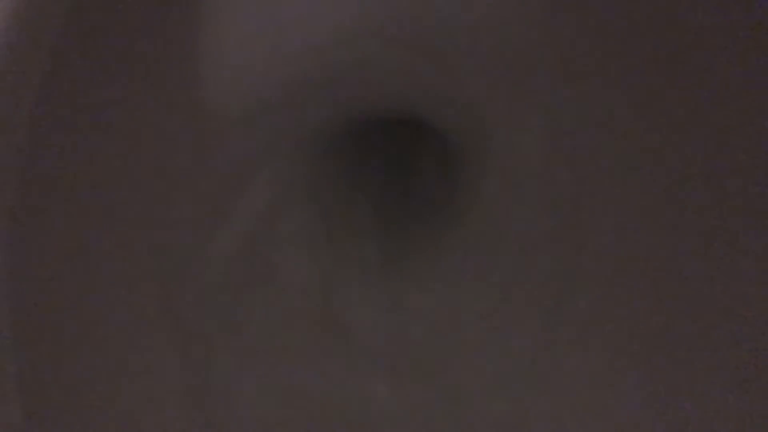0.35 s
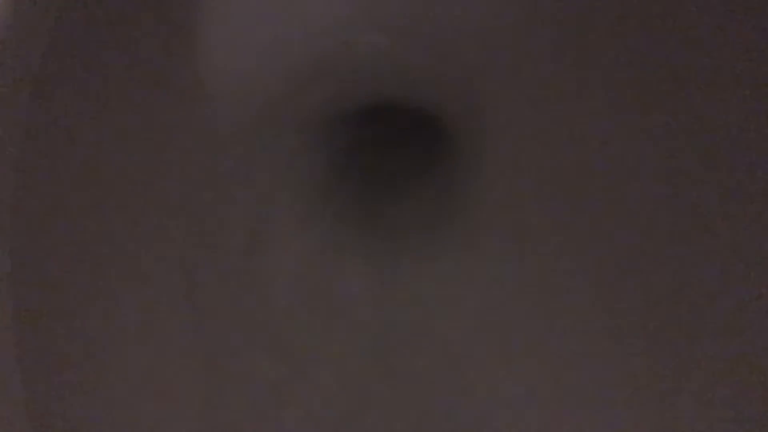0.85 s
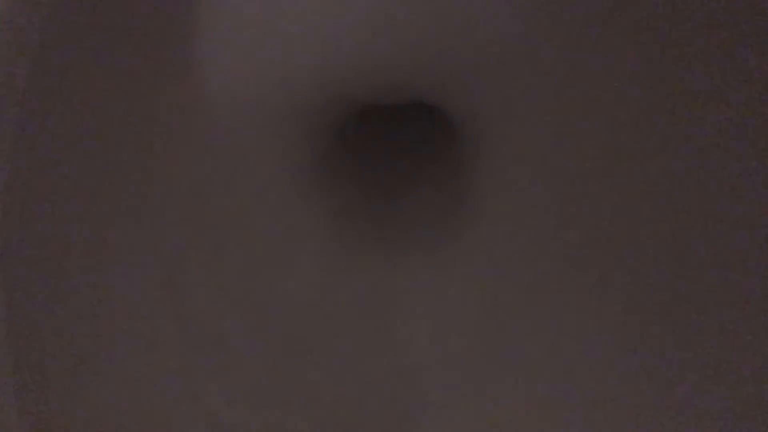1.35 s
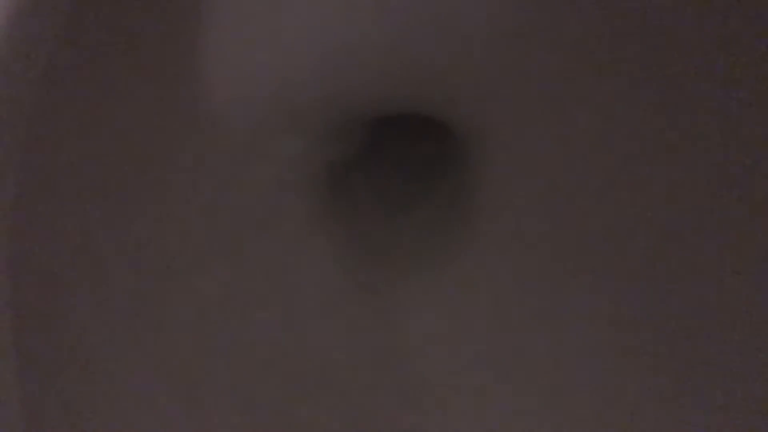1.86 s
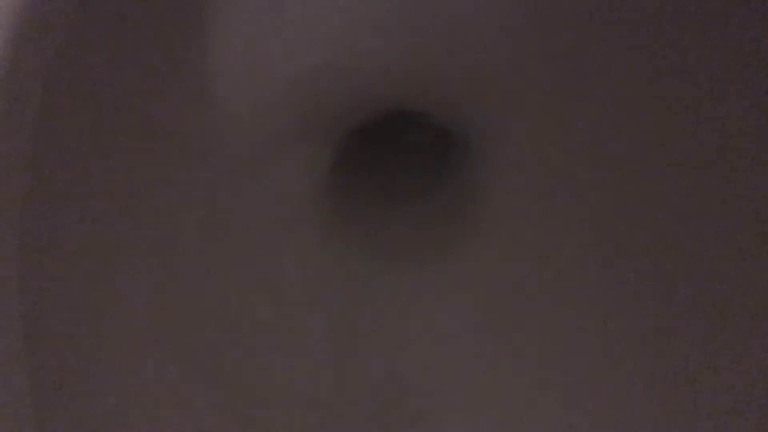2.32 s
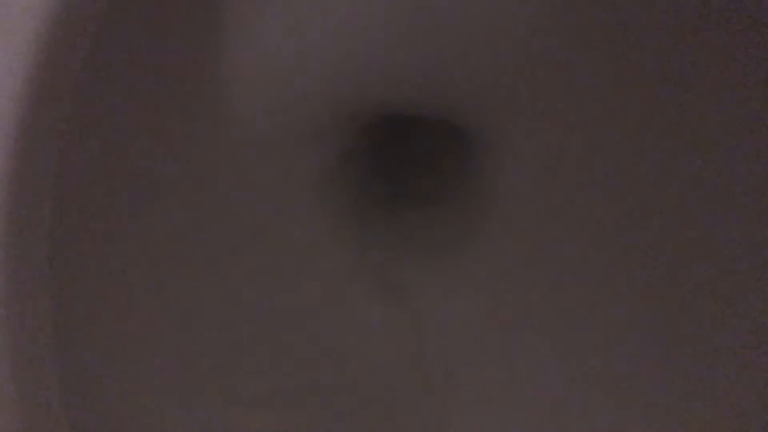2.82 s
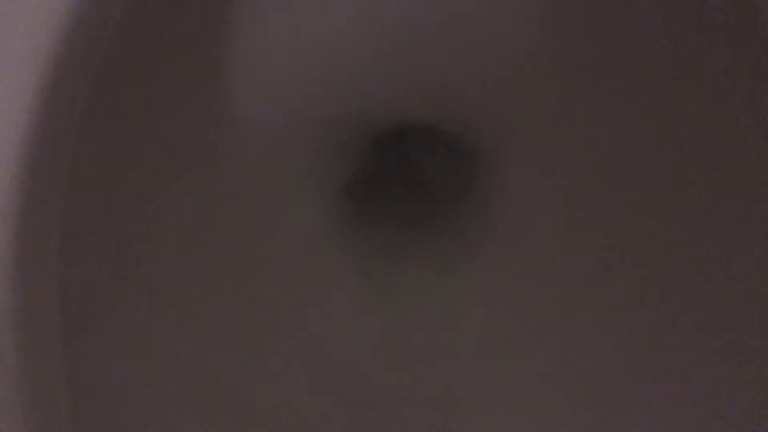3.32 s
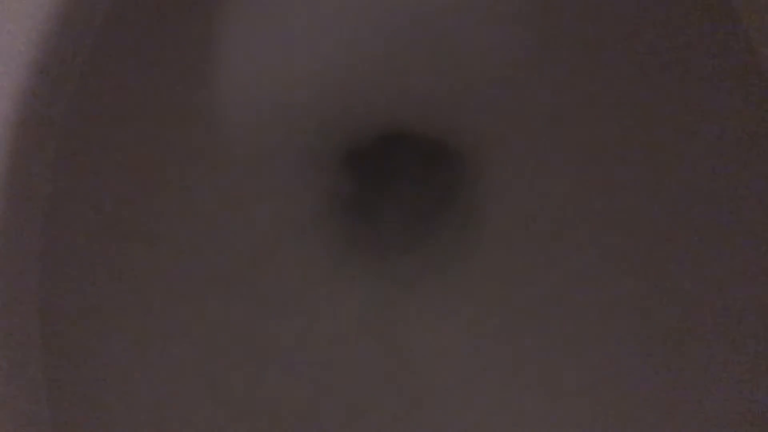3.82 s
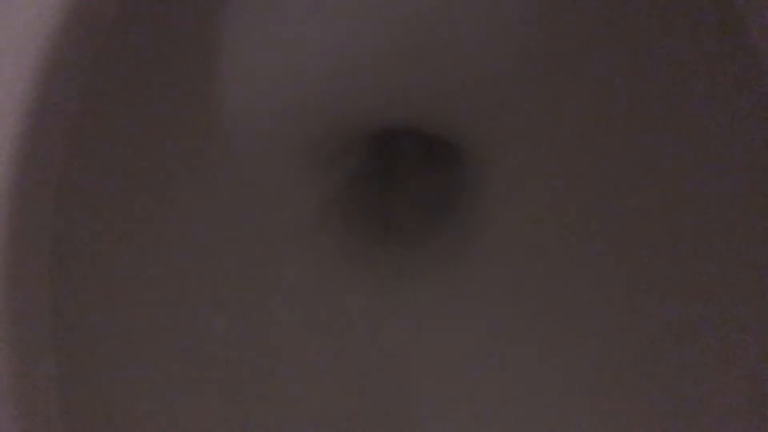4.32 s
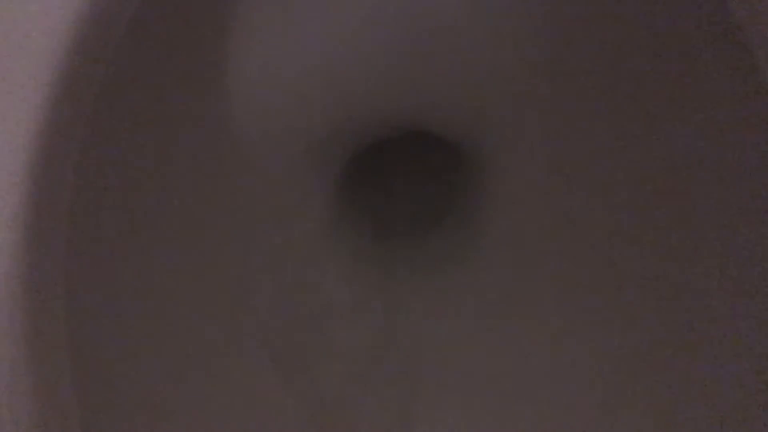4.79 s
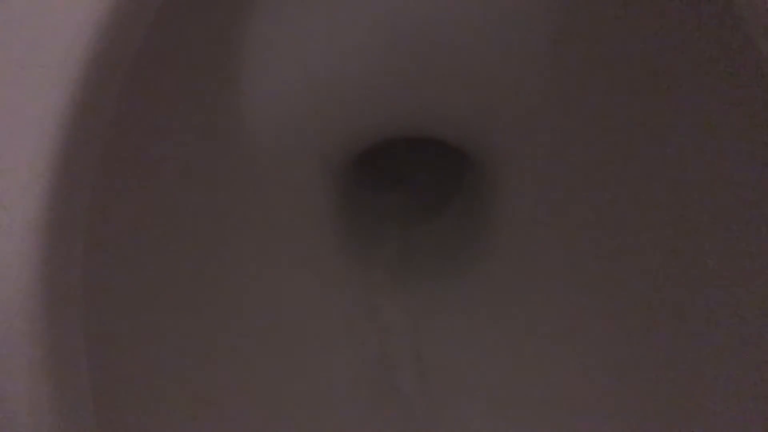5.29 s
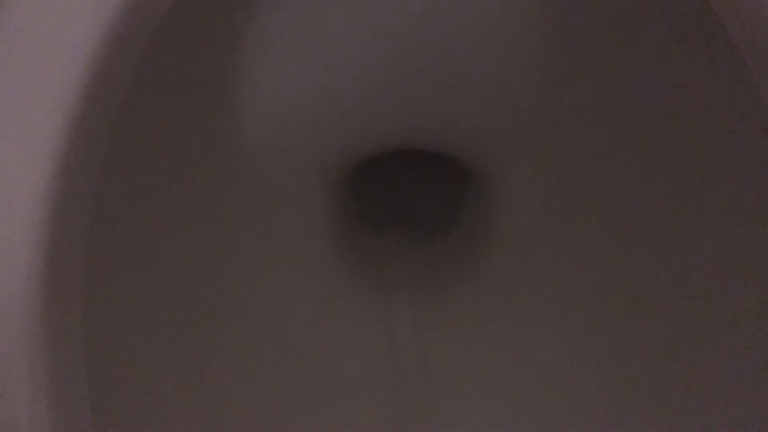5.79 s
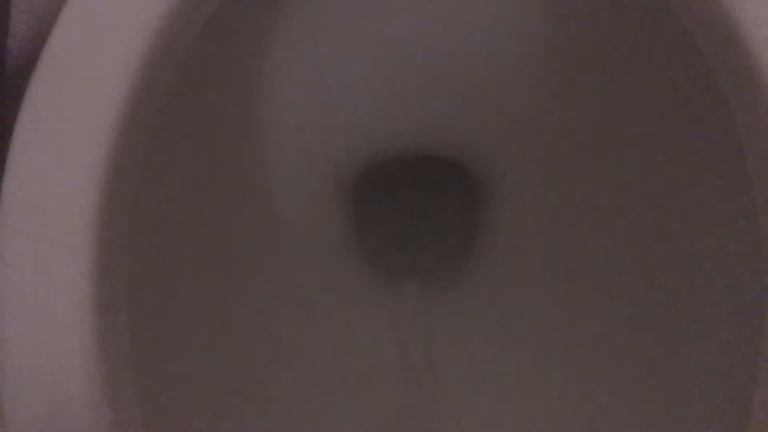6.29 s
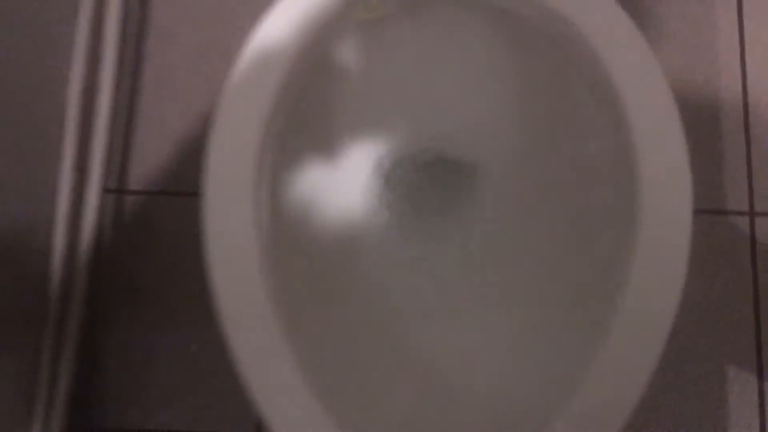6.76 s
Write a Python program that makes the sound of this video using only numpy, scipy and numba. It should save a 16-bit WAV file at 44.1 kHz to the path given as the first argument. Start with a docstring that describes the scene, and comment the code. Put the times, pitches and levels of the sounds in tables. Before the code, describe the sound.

Inside a toilet bowl in a small restroom, a flush is already under way. Bright jets hiss and spray under the rim while the trap surges and bubbles, swelling to deep, hollow gulps near two seconds. The water hiss runs on, then stops around five seconds, leaving loud glugs, slaps and drips, and one last soft rush through the pipe. The microphone is very close, with faint building rumble beneath.

```python
"""Toilet flush inside the bowl

A toilet flushes in a small restroom, heard by one microphone in the bowl (two equal channels).
Noise jets hiss under the rim, spray and turbulence ring the rim channel, and swarms of bubbles and surging
water in the trap ring the hollow bowl. The siphon breaks in glugs and whistles (dying sines of rising pitch)
and splashes (noise bursts); a last rush of filtered noise runs through the pipe over a low building rumble."""
import sys
import numpy as np
from scipy import signal
from scipy.fft import rfft, irfft, next_fast_len
from scipy.io import wavfile
from scipy.ndimage import uniform_filter1d
from numba import njit

SR = 44100
rng = np.random.default_rng(int(sys.argv[2]) if len(sys.argv) > 2 else 0)


def master_out(mix):
    """Clip the mix to full scale and print it as 16-bit PCM to the path in sys.argv[1]."""
    frames = np.transpose(np.atleast_2d(mix))
    ceiling = np.clip(frames, -1, 1)
    pcm = np.round(ceiling * 32767).astype(np.int16)
    wavfile.write(sys.argv[1], SR, pcm)


def to_linear_factor(level_db):
    """Convert decibel levels (scalar or array-like) to linear amplitude factors."""
    exponent = np.asarray(level_db, float) / 20
    return 10 ** exponent


N = 314874  # length in samples
SIZE = next_fast_len(N + SR)  # transform length, with room for ringing
HZ = np.arange(SIZE // 2 + 1) * SR / SIZE

# Water and air working in the trap between gulps.
# Each row: time in seconds, surge level in dB, churning air level in dB.
TRAP = [(0.0, -33.5, -40), (0.27, -37, -40), (0.49, -39, -34.5), (1.15, -33, -31), (1.5, -25.5, -23.5),
        (1.95, -28.5, -23.5), (2.5, -35, -26.5), (2.85, -32.5, -26), (3.3, -37.5, -35),
        (4.05, -39.5, -31.5), (4.5, -36, -35), (4.8, -43, -33), (4.98, -67, -40), (5.335, -55, -34),
        (5.36, -20.5, -29), (5.6, -25, -28), (5.75, -33.5, -32), (6.0, -37, -37.5), (6.29, -48, -43),
        (6.45, -65, -51)]
# Gulps of air drawn through the trap.
# Each row: peak time in seconds, surge burst in dB, churning air burst in dB.
GULPS = [(0.089, -22.5, -25), (0.538, -37, -29.5), (0.789, -27, -32), (0.994, -28, -24), (1.261, -22, -19),
         (1.431, -18.5, -16), (1.555, -19, -24), (1.6, -19.5, -18), (1.729, -15.5, -15), (1.856, -10, -14),
         (1.906, -18, -27), (2.041, -34, -21.5), (2.281, -22, -38), (2.43, -24, -17), (2.672, -28, -42),
         (2.908, -27, -42), (4.142, -27.5, -25), (4.58, -24.5, -23), (5.031, -57, -21), (5.161, -30, -29),
         (5.353, -15, -19), (5.378, -19, -14.5), (5.504, -17, -26), (5.59, -13, -18), (5.658, -19.5, -21),
         (5.832, -21, -18.5), (5.908, -20, -30), (5.98, -30, -32), (6.05, -32, -35), (6.11, -38, -35)]
# Spectrum of the surge. Each row: frequency in Hz, relative density in dB per Hz.
SURGE_SPECTRUM = [(120, -44), (190, -12), (280, -7), (400, -11), (550, -64)]
# Big bubbles breaking, and short whistles of the rim channel near 1700 Hz around 1 s, before the bowl rings.
# Each row: start in seconds, starting level in dB, starting pitch in Hz, time to fall 60 dB in seconds.
GLUGS_AND_WHISTLES = [(0.584, -15, 1670, 0.052), (0.935, -18, 1685, 0.16), (0.989, -19, 1700, 0.17),
                      (1.025, -17, 1520, 0.05), (1.04, -17, 1710, 0.095), (1.078, -15.5, 910, 0.045),
                      (1.25, -14, 1010, 0.063), (1.33, -15.5, 1044, 0.053), (1.653, -12.5, 1650, 0.068),
                      (1.726, -7.5, 760, 0.047), (1.824, -6.5, 1140, 0.022), (1.855, -10, 800, 0.021),
                      (1.878, -13.5, 1630, 0.069), (1.889, -10, 2170, 0.069), (1.904, -16, 1656, 0.11),
                      (2.02, -8.5, 1127, 0.055), (2.046, -16, 1150, 0.051), (2.085, -12, 775, 0.032),
                      (2.159, -9.5, 1110, 0.037), (2.275, -16.5, 578, 0.098), (2.363, -9, 1140, 0.024),
                      (2.495, -11.5, 1240, 0.027), (2.649, -10, 1010, 0.038), (2.714, -10.5, 890, 0.032),
                      (2.755, -18, 1537, 0.049), (2.78, -13, 832, 0.088), (2.81, -18, 845, 0.017),
                      (3.014, -12.5, 1530, 0.037), (3.039, -15, 1010, 0.031), (3.244, -9.5, 1108, 0.055),
                      (3.312, -12, 1640, 0.12), (3.623, -13, 1620, 0.024), (3.929, -18, 555, 0.057),
                      (3.965, -15, 1010, 0.055), (4.149, -20, 333, 0.11), (4.187, -17.5, 1040, 0.069),
                      (4.192, -21.5, 610, 0.094), (4.44, -16, 1050, 0.04), (4.579, -29, 357, 0.032),
                      (4.636, -18, 3100, 0.03), (4.688, -17, 2450, 0.027), (4.697, -20, 896, 0.068),
                      (4.75, -23, 2450, 0.17), (4.785, -20, 2200, 0.08), (4.8, -23, 870, 0.049),
                      (4.849, -19, 2120, 0.022), (4.917, -17, 1160, 0.043), (5.009, -14, 1220, 0.14),
                      (5.026, -30, 596, 0.021), (5.04, -9.5, 980, 0.056), (5.112, -22.5, 940, 0.034),
                      (5.152, -16.5, 1180, 0.044), (5.166, -8, 830, 0.0093), (5.213, -21, 1000, 0.041),
                      (5.294, -27, 1180, 0.032), (5.351, -14, 780, 0.04), (5.362, -14, 790, 0.08),
                      (5.375, -22, 1020, 0.04), (5.385, -16, 1250, 0.03), (5.409, -6.5, 890, 0.024),
                      (5.418, -19, 1030, 0.028), (5.455, -24, 1240, 0.074), (5.474, -24, 1830, 0.04),
                      (5.506, -19, 1350, 0.05), (5.551, -18, 795, 0.033), (5.582, -8, 840, 0.02),
                      (5.592, -18, 876, 0.06), (5.608, -17, 1060, 0.035), (5.652, -11.5, 870, 0.056),
                      (5.672, -17, 870, 0.055), (5.736, -22, 870, 0.052), (5.772, -23, 900, 0.03),
                      (5.801, -23, 935, 0.027), (5.822, -19, 840, 0.074), (5.846, -14.5, 1380, 0.049),
                      (5.888, -18, 620, 0.079), (5.925, -28, 1010, 0.027), (5.944, -16.5, 860, 0.042),
                      (5.973, -20, 900, 0.038), (6.039, -15, 888, 0.081), (6.108, -26, 580, 0.1),
                      (6.158, -26.5, 1140, 0.053), (6.189, -25, 860, 0.03)]
# Drops slapping water and porcelain, before the bowl rings.
# Each row: start in seconds, peak in dB, centre in Hz, relative weight of the broad spatter (0 to 1).
SPLASHES = [(1.892, -4, 4660, 0.14), (1.905, -14, 5200, 0.4), (4.917, -10, 2400, 0.75),
            (4.9532, -14, 2960, 0.65), (5.038, -18, 2760, 0.36), (5.075, -16, 3750, 0.7),
            (5.215, -2, 8360, 0.95), (5.239, -22, 3140, 0.25), (5.2724, -26, 5220, 0.3),
            (5.297, -29, 2700, .3), (5.32, -26, 2480, 0.3), (5.363, -22, 3800, 0.7), (5.374, -14, 3050, 1),
            (5.399, -25, 3100, 0.6), (5.41, -22, 3600, 0.3), (5.475, -26, 2800, 0.3), (5.506, -18, 2580, 1),
            (5.526, -25, 3400, 0.5), (5.54, -27, 2500, 0.1), (5.552, -25, 2600, 0.2),
            (5.5832, -19, 2350, 0.5), (5.609, -18, 1890, 0.4), (5.652, -16, 2400, 0.5),
            (5.668, -20, 4500, 0.8), (5.7405, -17.5, 2530, 0.1), (5.7722, -13.5, 11100, 0.44),
            (5.822, -15, 2420, 0.2), (5.84, -14, 2600, 1), (5.888, -22, 2420, 0.3),
            (5.8997, -24, 4620, 0.3), (5.925, -24, 2400, 0.2), (5.974, -19.5, 2600, 0.34),
            (6.0257, -35, 7260, 0.4), (6.0536, -17, 5300, 0.47), (6.1229, -32, 6410, 0.4),
            (6.157, -19, 2820, 1), (6.179, -30, 3600, 0.1), (6.196, -16.5, 11900, 0.6),
            (6.225, -18.5, 11100, 1), (6.259, -34, 2680, 0.24), (6.32, -27, 5170, 0.25),
            (6.4058, -30, 10630, 0.25), (6.504, -24, 1210, 0.4)]
# Air modes of the bowl.
# Each row: frequency in Hz, width in Hz, level at full share in dB over the direct sound.
BOWL_MODES = [(272.8, 6.9, 16.5), (595.6, 24, 10.5), (882, 38, 11.5), (1010, 216, 12.5), (1180, 120, 7.5),
              (1380, 28, 5.5), (1826, 22, 12.5), (2420, 64, 6), (2960, 40, 7.5)]
# The rim jets between gusts. Each row: time in seconds, spray level in dB, jet hiss level in dB.
JETS = [(0.0, -20, -19), (0.1, -19, -18.5), (0.28, -16.5, -20.5), (0.48, -28, -19), (0.55, -19.5, -20),
        (1.02, -22.5, -18), (1.2, -25, -21), (1.9, -29, -20), (2.6, -27.5, -20.5), (3.26, -27, -20),
        (4.098, -29.5, -21), (4.5, -33.5, -24.5), (4.85, -28.5, -35), (5.0, -36.5, -43), (5.3, -44, -49),
        (5.45, -38.5, -43), (5.7, -42, -49), (6.1, -49.5, -48.5), (6.45, -58, -56)]
# Gusts of spray off the porcelain.
# Each row: time of full level in seconds, hold in seconds, spray burst in dB, jet hiss burst in dB.
GUSTS = [(0.757, 0.024, -15, -21), (0.849, 0.0083, -20.5, -17.5), (0.947, 0.08, -18, -31),
         (1.255, 0.03, -17.5, -20), (1.365, 0.17, -17.5, -20.5), (1.405, 0.035, -15, -24),
         (1.555, 0.063, -20, -26), (1.731, 0.081, -19, -23.5), (1.873, 0.027, -16.5, -26),
         (2.057, 0.14, -25.5, -20.5), (2.3, 0.033, -21, -21.5), (2.397, 0.041, -21.5, -21),
         (2.751, 0.013, -18, -30), (2.957, 0.0086, -19, -17), (3.043, 0.043, -19.5, -25),
         (3.293, 0.39, -20, -23), (4.619, 0.051, -24, -28), (4.685, 0.032, -26, -34),
         (4.73, 0.057, -23, -31.5), (4.812, 0.016, -25, -34), (4.9, 0.063, -31, -45),
         (5.023, 0.053, -30, -38.5), (5.343, 0.071, -47, -38.5), (5.523, 0.09, -37, -43),
         (5.652, 0.019, -28.5, -39), (5.743, 0.014, -31, -57), (5.825, 0.023, -28.5, -34.5),
         (5.886, 0.018, -32, -52)]
# The rim jets thin from sheets of water to single drops. One row: start in seconds, end in seconds.
JETS_FADE = (4.87, 5.01)
# Spectra of the rim jets. Each row: frequency in Hz, relative density in dB per Hz.
SPRAY_SPECTRUM = [(200, -19), (320, -5.5), (600, -34), (1000, -2), (1600, -4), (2600, -4), (4000, 3.5),
                  (6000, 0.5), (8000, 3)]
HISS_SPECTRUM = [(1500, -18), (2500, -10), (3570, -7), (4340, -4), (5520, 0.5), (7420, -2), (9220, 1),
                 (11400, 0), (14200, -1.5), (15200, -1), (16500, -33)]
# Air roaring in the rim channel. Each row: time in seconds, level in dB.
ROAR = [(0.0, -27), (0.18, -19), (0.37, -32.5), (0.85, -31.5), (1.03, -40), (2.05, -35.5), (3.11, -41),
        (3.47, -28), (3.8, -40)]
# Air modes of the rim channel and its pipe, about evenly spaced.
# Each row: frequency in Hz, width in Hz, level at full share in dB over the direct sound.
PIPE_MODES = [(309, 29, 13), (620, 54, 4), (953, 34, 9), (1031, 38, 7.5), (1317, 9.4, 14), (1613, 32, 11),
              (1688, 33, 6.5), (1930, 34, 7), (2202, 65, 6), (2530, 45, 2), (2760, 30, 6), (3160, 220, 3),
              (4497, 35, 5), (5500, 140, -5)]
# The last rush. Each row: time in seconds, level in dB, treble over that level in dB.
RUSH = [(6.33, -49, -19), (6.46, -42, -15), (6.5, -33, -12), (6.53, -39, -16), (6.57, -31.5, -10),
        (6.64, -26.5, -6.5), (6.72, -27, -10.5), (6.8, -31.5, -16), (6.92, -37, -20), (7.14, -47, -8)]
# Spectra of the last rush. Each row: frequency in Hz, relative density in dB per Hz.
RUSH_LOW = [(24, -33), (40, -9), (97, -17), (140, -9), (257, -13), (314, -4.5), (624, -18.5), (764, -14.5),
            (1140, -15.5), (1340, -15), (5000, -31), (6500, -32), (11000, -120)]
RUSH_HIGH = [(2350, 0), (4000, -3), (5350, -12), (6400, -6), (7750, -5), (14500, -6.5), (16000, -9)]
# Echoes off water and porcelain cancel a few pitches.
# Each row: frequency in Hz, width in Hz, cancelled part at full share in dB.
ECHO_DIPS = [(4950, 190, -4), (7710, 350, -7), (10460, 560, -3)]
# Spectrum of the building's rumble. Each row: frequency in Hz, relative density in dB per Hz.
RUMBLE_SPECTRUM = [(15, -38), (25, 9), (80, 0.5), (180, -6), (242, -6.5), (463, -36), (591, -4),
                   (1040, -34), (1290, -40), (3250, -19.5), (5430, -25), (6920, -30), (16000, -46)]
# A narrow hum within the rumble. Each row: frequency in Hz, width in Hz, level in dB over the rumble.
HUM = [(75, 9.9, 7)]
# The rumble grows as the microphone is lifted out of the bowl. Each row: time in seconds, gain in dB.
LIFT = [(5.9, 0), (6.5, 1.5)]


def unit(x):
    """Normalization: scale to rms 1."""
    return x / np.sqrt(np.mean(x ** 2))


def shape(x, response):
    """Linear filtering: multiply the spectrum by a response given on HZ."""
    return irfft(rfft(x, SIZE) * response, SIZE)[:N]


def colour(points):
    """Spectral envelope: gain on HZ from (Hz, dB) points, -90 dB outside them."""
    hz, db = np.transpose(points)
    return to_linear_factor(np.interp(np.log(HZ + 1), np.log(hz), db, left=-90, right=-90))


def hollow(modes, share=1):
    """Modal resonance: direct sound plus a share of the ringing of an air space."""
    response = 1
    for hz, width, db in modes:
        mode = 1j * HZ * width / (hz ** 2 - HZ ** 2 + 1j * HZ * width)
        response = response + share * to_linear_factor(db) * mode
    return response


def ring(water, db, space):
    """Resonator excitation: a stream at db as heard after an air space, which rings on when it stops."""
    gain = np.sqrt(np.mean(water ** 2) / np.mean(shape(water, space) ** 2))
    return shape(unit(water) * to_linear_factor(db) * gain, space)


def walk(rate):
    """Slow random modulation: levels held 1 / rate s and slewed twice, with a spread near 1."""
    k = int(SR / rate)
    steps = np.repeat(rng.standard_normal(N // k + 1), k)
    return 1.1 * uniform_filter1d(uniform_filter1d(steps, k), k)[:N]


def flicker(x, edges_hz, rate, depth_db):
    """Independent band modulation: each band of x wavers in level on its own."""
    out = np.zeros(N)
    for low, high in zip(edges_hz, edges_hz[1:]):
        band = shape(x, (HZ >= low) & (HZ < high))
        out += band * to_linear_factor(depth_db * walk(rate))
    return out


def curves(table):
    """Linear interpolation: columns of a table as values per sample, -120 outside it."""
    s, *columns = np.transpose(table)
    return [np.interp(np.arange(N) / SR, s, c, left=-120, right=-120) for c in columns]


def swell(base_db, starts, holds, peaks_db, attack_s, t60_s):
    """Addition of powers: bursts that rise, hold and die away join a steady level."""
    power, t = to_linear_factor(2 * base_db), np.arange(SR) / SR
    for s, hold, db in zip(starts, holds, peaks_db):
        fall_db = 60 * np.maximum(t - hold, 0) / t60_s
        rise_db = 60 * np.maximum(1 - t / attack_s, 0) ** 2
        part = power[max(int((s - attack_s) * SR), 0):][:SR]
        part += to_linear_factor(2 * (db - fall_db - rise_db))[:len(part)]
    return 10 * np.log10(power)


@njit
def bubbles(s, size, hz, t60, glide, n, sr):
    """Bubble resonance: each rings as a dying sine whose pitch climbs by `glide` over its life."""
    out = np.zeros(n)
    for k in range(len(s)):
        start, life, phase = int(s[k] * sr), int(t60[k] * sr) + 1, 0.
        for i in range(min(life, n - start)):
            phase += 2 * np.pi * hz[k] * (1 + glide * i / life) / sr
            out[start + i] += size[k] * np.exp(-np.log(1000) * i / life) * np.sin(phase)
    return out


def swarm(count, low_hz, high_hz, cycles, spread_db, glide):
    """Random superposition: bubbles at random moments, each ringing for `cycles`, a few far larger if spread."""
    when, pitch, big = rng.random((count, 3)).T
    hz = low_hz * (high_hz / low_hz) ** pitch
    size = to_linear_factor(spread_db * np.minimum(-np.log(1 - big), 4))
    return unit(bubbles(when * N / SR, size, hz, cycles / hz, glide, N, 1. * SR))


def trap_levels():
    """Impulsive flow: surge and churn leap at every gulp."""
    s, *peaks = np.transpose(GULPS)
    attack_s, surge_t60_s, churn_t60_s = 0.021, 0.2, 0.14
    holds = np.full(len(s), attack_s)  # the fall begins as soon as the peak is reached
    return [swell(base, s, holds, db, attack_s, t60)
            for base, db, t60 in zip(curves(TRAP), peaks, (surge_t60_s, churn_t60_s))]


def surge():
    """Air-column excitation: slugs of water thump the trap, as noise and low bubble tones."""
    thumps = swarm(count=1500, low_hz=210, high_hz=410, cycles=5.2, spread_db=0.0, glide=0.32)
    water = 3.5 * rng.standard_normal(N) + 0.62 * thumps
    return shape(water, colour(SURGE_SPECTRUM)) * to_linear_factor(4.0 * walk(30))


def churn():
    """Air entrainment: air torn into many bubbles in the swirl, with wet splatter between them."""
    small = swarm(count=14000, low_hz=504, high_hz=1530, cycles=19.3, spread_db=1.5, glide=0.43)
    large = swarm(count=2200, low_hz=330, high_hz=1400, cycles=14.0, spread_db=4.0, glide=0.25)
    splatter = swarm(count=4000, low_hz=910, high_hz=3600, cycles=6.3, spread_db=2.5, glide=0.28)
    return (0.51 * small + 0.86 * large + 0.56 * splatter) * to_linear_factor(2.9 * walk(40))


def glugs_and_whistles():
    """Damped resonance: each bubble or whistle rings, with a snap, five small bubbles and a kick to the bowl."""
    s, db, hz, t60 = np.transpose(GLUGS_AND_WHISTLES)
    count = len(s)
    body = bubbles(s, to_linear_factor(db), hz, t60, 0.033, N, 1. * SR)
    snap = bubbles(s, 0.4 * to_linear_factor(db), 2.2 * hz, np.full(count, .002), .1, N, 1. * SR)
    kick = bubbles(s, 0.025 * to_linear_factor(db), np.full(count, 290.), np.full(count, .015), .1, N, 1. * SR)
    late, pitch, small = rng.random((count, 3, 5)).transpose(1, 2, 0)
    brood_s = (s + 0.03 * late).ravel()
    brood_size = to_linear_factor(db - 13.0 - 9.0 * small).ravel()
    brood_hz = (hz * 0.68 * 3.5 ** pitch).ravel()
    brood = bubbles(brood_s, brood_size, brood_hz, np.full(late.size, .015), .2, N, 1. * SR)
    return shape(body + snap + brood, hollow(BOWL_MODES, share=0.061)) + shape(kick, hollow(BOWL_MODES))


def kicks():
    """Impulse response: each gulp jolts the air in the bowl once, which rings on cleanly."""
    s, surge_db, _ = np.transpose(GULPS)
    size = to_linear_factor(surge_db - 6)
    jolt = bubbles(s, size, np.full(len(s), 300.), np.full(len(s), .014), 0.077, N, 1. * SR)
    return shape(jolt, hollow(BOWL_MODES))


def splashes():
    """Drop impact: a narrow ring of noise around one pitch, and a broad slap with a spattering tail."""
    out = np.zeros(N + SR)
    t = np.arange(SR // 5) / SR
    fade = np.exp(-np.log(1000) * t / 0.047)  # falls 60 dB in 0.047 s
    spatter_fade = 0.38 * fade ** 0.68 + 1.75 * fade ** 2.1  # slow tail plus sharp slap
    onset = np.minimum(t / 0.00097, 1)
    noises = rng.standard_normal((len(SPLASHES), len(t)))
    for (s, db, hz, broad), noise in zip(SPLASHES, noises):
        edges = np.clip([hz / 1.102, hz * 1.113], 100, .45 * SR)
        band = signal.butter(2, edges, "bandpass", fs=SR, output="sos")
        tone = unit(signal.sosfilt(band, noise))
        bright = np.diff(noise, 2, prepend=[0, 0])
        burst = (tone * fade + broad * 0.76 * bright * spatter_fade) * onset
        out[int(s * SR):][:len(t)] += to_linear_factor(db) * burst / np.abs(burst).max()
    return shape(out[:N], hollow(BOWL_MODES, share=0.49))


def rim_levels():
    """Common modulation: spray and hiss swell together in every gust."""
    s, length, *peaks = np.transpose(GUSTS)
    attack_s, t60_s = 0.006, 0.085
    return [swell(base, s, length + attack_s, db, attack_s, t60_s)
            for base, db in zip(curves(JETS), peaks)]


def spray(sheets):
    """Sheet breakup: water breaks on porcelain as noise and fizz; as the jets thin, drops are left."""
    fizz = swarm(count=9000, low_hz=1547, high_hz=6500, cycles=45.0, spread_db=3.5, glide=0.12)
    sheet = unit(shape(rng.standard_normal(N), colour(SPRAY_SPECTRUM))) + 0.55 * fizz
    edges_hz = [0, 1150, 1500, 1800, 2100, 2600, 3000, 3700, 4700, 5800, SR]
    sheet = flicker(sheet, edges_hz, rate=28, depth_db=2.0)
    drops = swarm(count=4000, low_hz=1530, high_hz=6000, cycles=14.0, spread_db=3.0, glide=0.2)
    mix = sheets * sheet + (1 - sheets) * (drops + 0.44 * sheet)
    ragged_db = 2.5 + 3 * (1 - sheets)
    return mix * to_linear_factor(1.2 * walk(21.9) + ragged_db * walk(110))


def hiss(sheets):
    """Jet noise: thin jets from under the rim crackle with droplets, more ragged as they die."""
    size = to_linear_factor(-2.6 * np.log(1 - rng.random(N)))
    struck = rng.random(N) < .1  # one sample in ten carries a droplet
    drops = size * struck * rng.choice([-1, 1], N)
    jets = unit(shape(rng.standard_normal(N) + .5 * unit(drops), colour(HISS_SPECTRUM)))
    jets = flicker(jets, [0, 4800, 6500, 8500, 10400, 13000, SR], rate=45, depth_db=1.5)
    ragged_db = 0.96 + 2.0 * (1 - sheets)
    return jets * to_linear_factor(ragged_db * walk(70))


def roar():
    """Flow excitation: turbulence blows the lower modes of the rim channel like a rough flute."""
    top_rolloff = 1 / (1 + (HZ / 2100) ** 8)
    bass_rolloff = 1 / (1 + (800 / (HZ + 1)) ** 3)
    breathy = shape(rng.standard_normal(N), top_rolloff * bass_rolloff)
    level_db, = curves(ROAR)
    return ring(breathy * to_linear_factor(5.7 * walk(39.7)), level_db, hollow(PIPE_MODES, share=6.2))


def rush():
    """Pipe resonance: the last water is smooth noise on the pipe's modes, plus treble at its own level."""
    db, treble_db = curves(RUSH)
    low = unit(shape(rng.standard_normal(N), colour(RUSH_LOW) * hollow(PIPE_MODES, share=0.24)))
    high = unit(shape(rng.standard_normal(N), colour(RUSH_HIGH)))
    return to_linear_factor(db + 2.0 * walk(30)) * (low + to_linear_factor(treble_db) * high)


def rumble():
    """Filtered background noise: the building's low rumble with a narrow hum, growing with the lift."""
    noise = unit(shape(rng.standard_normal(N), colour(RUMBLE_SPECTRUM) * hollow(HUM)))
    lift_db = np.interp(np.arange(N) / SR, *np.transpose(LIFT))
    return noise * to_linear_factor(-43.5 + lift_db)


def scene():
    """Superposition: water in bowl, rim and pipe shares the echo dips; the rumble comes from outside."""
    surge_db, churn_db = trap_levels()
    spray_db, hiss_db = rim_levels()
    sheets = np.interp(np.arange(N) / SR, JETS_FADE, [1, 0])  # 1 = sheets of water, 0 = single drops
    bowl = hollow(BOWL_MODES)
    trap = ring(surge(), surge_db, bowl) + ring(churn(), churn_db, bowl) + glugs_and_whistles() + kicks()
    rim = ring(spray(sheets), spray_db, hollow(PIPE_MODES)) + roar() + hiss(sheets) * to_linear_factor(hiss_db)
    # a negative share cancels instead of ringing
    water = shape(trap + rim + splashes() + rush(), hollow(ECHO_DIPS, share=-0.98))
    return np.tile(water + rumble(), (2, 1))


def band_limit(x):
    """A steep low-pass at the top of the band."""
    return signal.sosfilt(signal.butter(12, 17000, fs=SR, output="sos"), x)


def record(dry):
    """Saturation and band limits: the microphone rounds loud peaks and drops deepest bass and very top."""
    rounded = np.tanh(1.1 * dry) / 1.1
    bass_cut = signal.sosfilt(signal.butter(6, 44, "highpass", fs=SR, output="sos"), rounded)
    top_cut = signal.sosfilt(signal.ellip(16, .3, 80, 15740, fs=SR, output="sos"), bass_cut)
    return band_limit(top_cut)


dry = scene()
out = record(dry)
master_out(out)
```